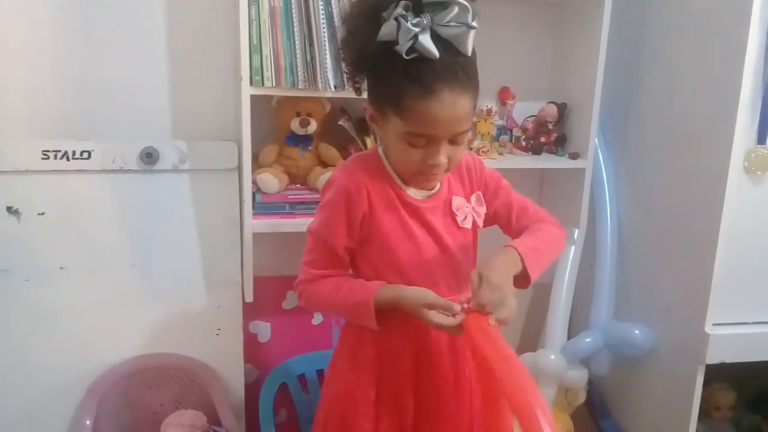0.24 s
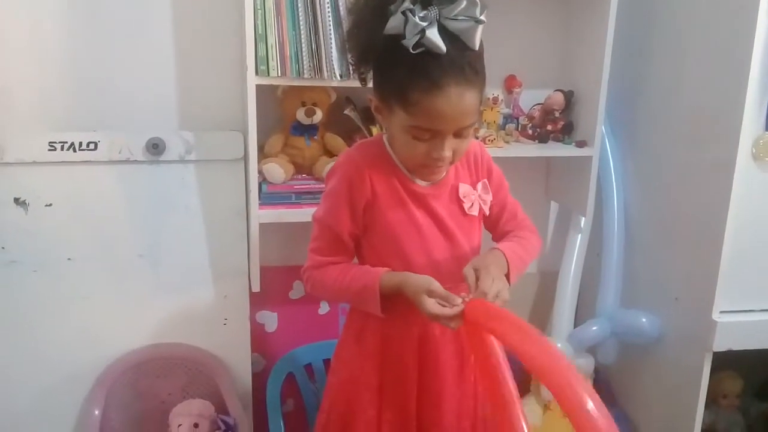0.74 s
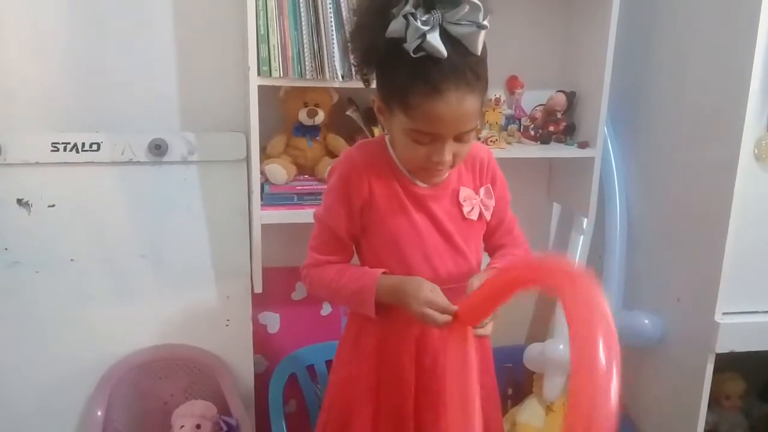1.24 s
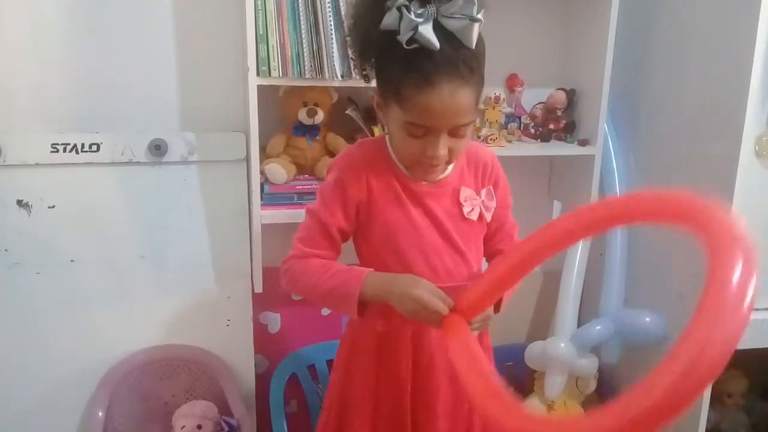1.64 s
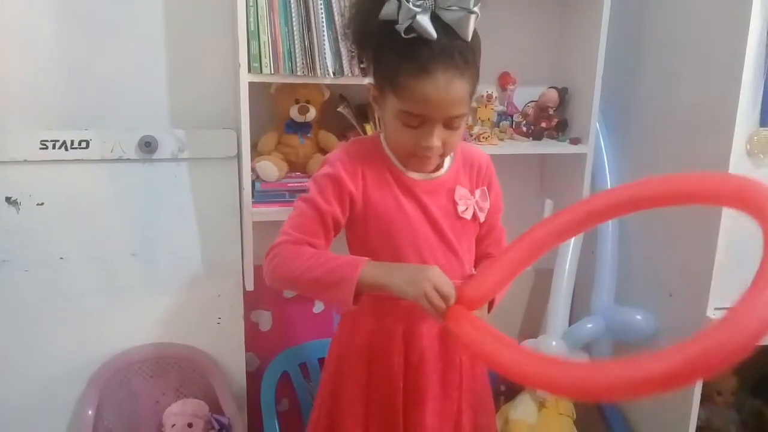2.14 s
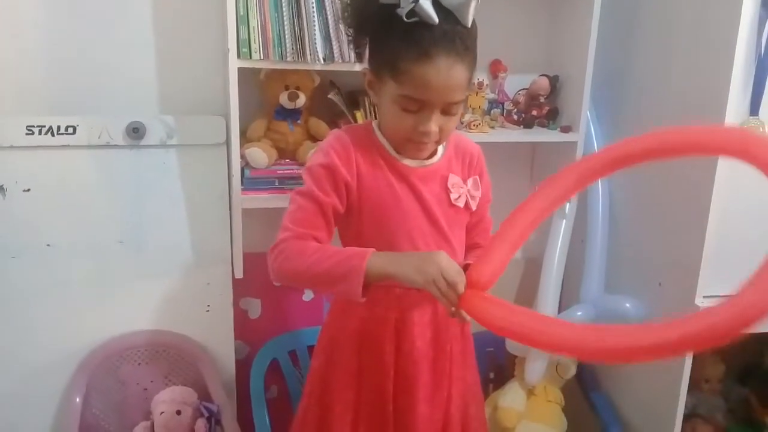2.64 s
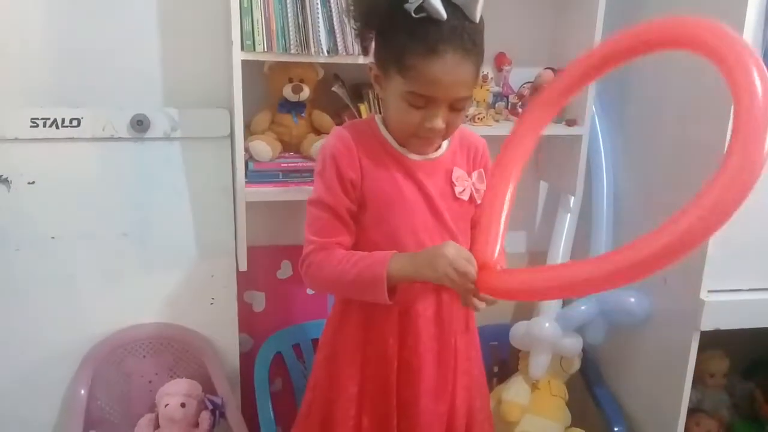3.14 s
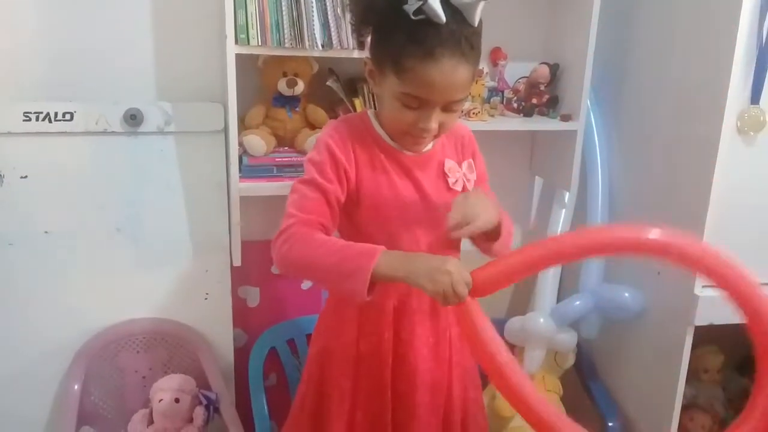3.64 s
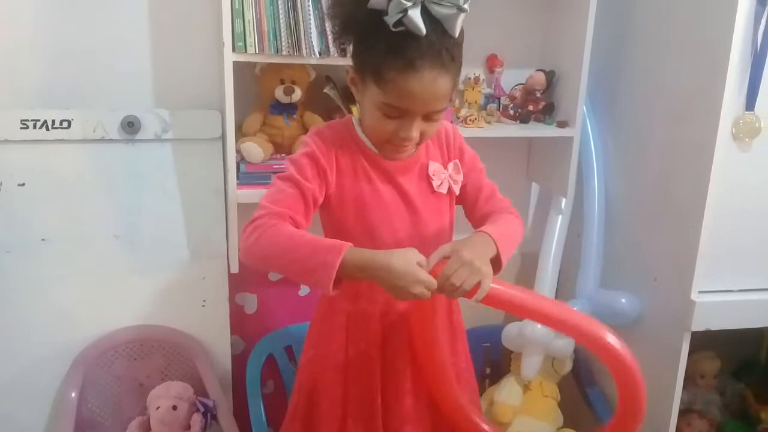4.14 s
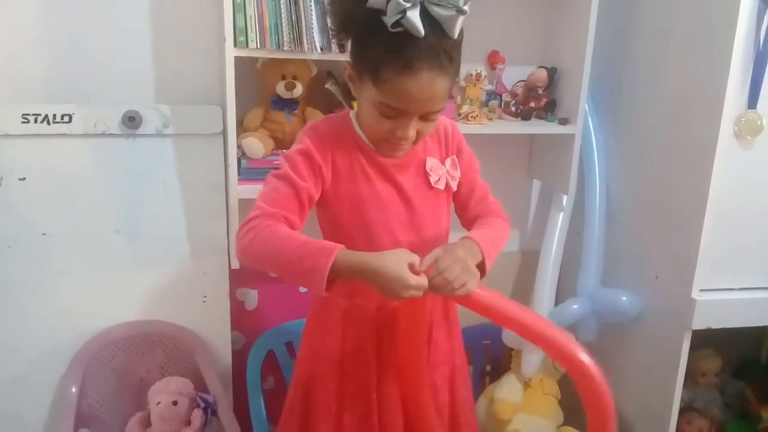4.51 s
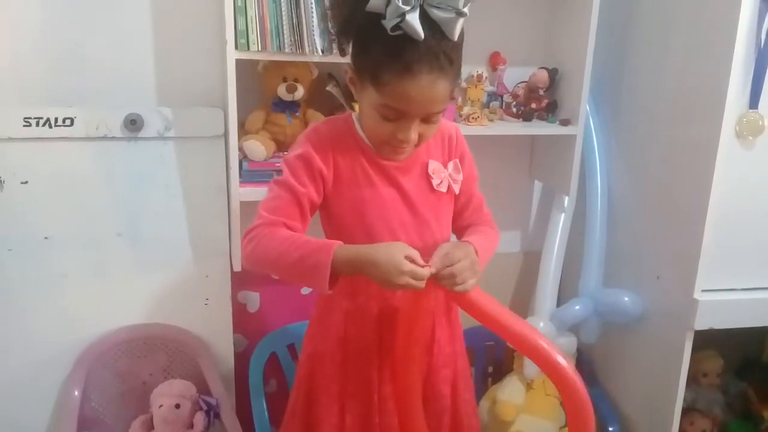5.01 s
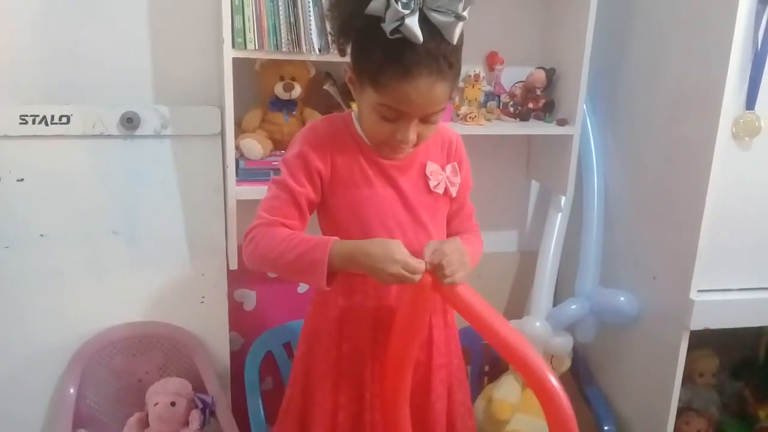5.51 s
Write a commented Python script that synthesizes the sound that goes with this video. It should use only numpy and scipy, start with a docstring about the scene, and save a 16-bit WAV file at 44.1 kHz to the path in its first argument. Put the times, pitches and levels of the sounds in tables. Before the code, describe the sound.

A long latex balloon is twisted and knotted by hand in a small, lively room, heard close by. From 0.1 to 0.4 s, sharp snaps and tight ratcheting creaks burst out over a low, wavering groan. Soft uneven drags and a strong snap follow at 0.65 to 0.85 s. Between 1.1 and 1.8 s, snaps and buzzy creaks come in quick clusters, each setting off a short hollow balloon ring. It nearly quiets around 1.9 s, then lighter snaps resume, with creaks at 2.3 and 2.45 s and a strong cluster near 2.6 s. Weaker, scattered snaps and faint squeals continue to 3.4 s. After a pause, soft grainy strokes hiss from 4.0 s, with a clear snap at 4.75 s. Tiny gliding chirps and fading rubs occupy 5.1 to 5.8 s. Dense short echoes and faint bass-heavy room noise stay behind everything.

```python
"""A long latex balloon is twisted into a loop and knotted by hand in a small room.
From the start the stretched skin sticks and slips under the fingers: soft drags of tiny uneven steps,
sharp snaps, creaks made of runs of hard slips, and brief wavering squeals. Slips set the balloon's modes ringing.
Later, strokes over the knot hiss softly, made of grainy coloured noise, with short gliding chirps.
Dense echoes and a faint steady room noise lie behind it all."""
import sys
import numpy as np
from scipy import signal
from scipy.fft import rfft, irfft, next_fast_len
from scipy.io import wavfile

SR = 44100
rng = np.random.default_rng(int(sys.argv[2]) if len(sys.argv) > 2 else 0)


def log_audio(samples):
    """Write samples as a 16-bit WAV file to the path given in sys.argv[1]."""
    # one column per channel
    frames = np.atleast_2d(samples).T
    # limit to full scale, then quantise
    limited = np.clip(frames, -1, 1)
    pcm = np.round(limited * 32767).astype(np.int16)
    wavfile.write(sys.argv[1], SR, pcm)


N = 254155
TIME = np.arange(N) / SR
LN_60DB = np.log(1000)  # a 60 dB decay as a natural logarithm


# Lone snaps, the skin letting go once: start_s, level_db, bass_db, edge_db
SNAPS = [(0.1206, -7.5, -2, -22), (0.1297, 1, -1.5, -15), (0.6571, -9, 10.5, -22), (0.8125, -11.5, -4, 3.5),
         (0.825, 2.5, 3.5, -6), (1.1376, -1.5, 6.5, -17), (1.1436, -8.5, 10.5, 9), (1.4537, 2, 3.5, 3),
         (1.5734, -4.5, 3, 2), (1.6905, 1.5, -18, -15), (1.941, -33.5, -6, 21), (1.9632, -33, 17.5, 20),
         (2.0456, -26, 0, 16.5), (2.0529, -9, -6, 7.5), (2.079, -12.5, -7, 2), (2.1311, -9.5, -33, 2),
         (2.3049, -10, -6, -11), (2.5604, 0.5, -10, -11), (2.5972, -7.5, -1, -3), (2.6197, 4.5, -24, -2.5),
         (2.6344, 0.5, -4, -3), (2.6904, -16.5, -16, 11.5), (2.7399, -11.5, 4, -6), (2.9479, -13, -24, -28),
         (2.9878, -10.5, 4.5, -20), (3.043, -11.5, 10.5, -43), (3.0989, -4.5, 0.5, -17),
         (3.2326, -9.5, -22, -11), (3.304, -7.5, -8, 1.5), (3.928, -10, -1.5, -24), (4.043, -20, 8, 4),
         (4.249, -23, 9.5, -3), (4.747, -5, -13, -28)]


def slips(flutter_s=0.0011, dulling=0.13, size=160):
    """Each slip is a snap followed by a millisecond of flutter as the skin catches again."""
    out = np.zeros(N)
    events = SNAPS + creak_slips()
    chance = rng.standard_normal((len(events), size))
    fade = np.exp(-np.arange(size) / SR / flutter_s)
    for (start, level_db, bass_db, edge_db), noise in zip(events, chance):
        push = colour(0.12 * noise, [(1000, -2.0), (5000, 2.5)]) * fade
        push[0] = -1  # the snap itself
        push /= np.linalg.norm(push)
        # a sharp edge lifts all the treble; a soft one loses mainly the very top
        treble_db = max(edge_db, dulling * edge_db)
        pulse = skin_pulse(bass_db, treble_db, edge_db)
        add(out, start, undb(level_db) * np.convolve(push, pulse))
    return out


# Creaks, runs of hard slips while the neck is twisted:
# start_s, end_s, rate_slips_per_s, slip_level_db, creep_level_db, bass_db, edge_db
CREAKS = [(0.1473, 0.2002, 113, 7.5, -33.5, -6, -5), (0.2196, 0.2806, 51, 6, -32, -8, 0),
          (0.3824, 0.4121, 96, 3, -31.5, -8.5, -1.5), (1.1759, 1.2612, 60, 6.5, -31, 3.5, -8.5),
          (1.282, 1.3434, 67, -2, -34.5, 0.5, -11.5), (1.5064, 1.5343, 70, -1.5, -47, 2, -7),
          (1.5938, 1.6136, 76, -2, -45.5, 5.5, -14), (1.7139, 1.7595, 105, 2, -33, -5.5, -5.5),
          (2.316, 2.3437, 114, -2.5, -38.5, -3.5, -8.5), (2.44, 2.507, 48, -17.5, -52.5, 4, 8)]
HURRY = 0.2  # the slips of a creak come quicker as the grip gives way
SLIP_JITTER_S, SLIP_SCATTER_DB = 0.0005, -0.62
CREAK_PEAK_S = 0.033  # the force builds for this long, then eases
CREAK_RISE_DB_PER_S, CREAK_EASE_DB_PER_S = 68, 103


def creak_slips(count=24):
    """The slips of every creak as (start_s, level_db, bass_db, edge_db): they quicken, swell and ease off."""
    rows = []
    chance = rng.standard_normal((len(CREAKS), 2, count))
    for (start, end, rate, level_db, _, bass_db, edge_db), (timing, force) in zip(CREAKS, chance):
        length = end - start
        progress = np.linspace(0, 1, int(round(length * rate)) + 1)
        ages = length * progress * (1 + HURRY * (1 - progress))
        rise_db = CREAK_RISE_DB_PER_S * (ages - CREAK_PEAK_S)
        ease_db = CREAK_EASE_DB_PER_S * (CREAK_PEAK_S - ages)
        effort_db = np.minimum(rise_db, ease_db)
        for age, effort, late, hard in zip(ages, effort_db, timing, force):
            slip_s = start + age + SLIP_JITTER_S * late
            slip_db = level_db + effort + SLIP_SCATTER_DB * hard
            rows.append((slip_s, slip_db, bass_db, edge_db))
    return rows


CREEP_LAG_S, CREEP_OVERRUN_S = 0.006, 0.013
CREEP_BASS_DB = 6.5  # between the slips the skin creeps, deeper in tone


def creak_creep():
    """The drag that runs under every creak, as (start_s, end_s, level_db, bass_db, edge_db)."""
    return [(start + CREEP_LAG_S, end + CREEP_OVERRUN_S, creep_db, bass_db + CREEP_BASS_DB, edge_db)
            for start, end, _, _, creep_db, bass_db, edge_db in CREAKS]


# Drags, soft runs of tiny slips: start_s, end_s, level_db, bass_db, edge_db
DRAGS = [(0.011, 0.062, -44.5, -3.5, -5.5), (0.438, 0.514, -47, 3, 5.5), (0.546, 0.6, -52.5, 13, -27),
         (0.655, 0.709, -42, 8, 15), (0.72, 0.79, -61, -1, 11), (0.824, 0.856, -32, 8, 0),
         (0.878, 0.99, -55, 17.5, -3), (1.06, 1.092, -51.5, 7, 1), (1.224, 1.3, -26, 5, -28),
         (1.46, 1.533, -44, -2, -25), (2.073, 2.132, -59, 6.5, 2), (2.33, 2.377, -36.5, 2.5, -10),
         (2.5, 2.58, -42.5, 3, -4), (2.56, 2.685, -39.5, 5.5, -3), (2.956, 3.02, -48.5, -11, -12),
         (3.007, 3.165, -51.5, 12, -7), (3.233, 3.278, -48.5, 2, -7), (3.326, 3.375, -43, 10, -5.5),
         (3.719, 3.748, -54, -7, -34), (3.86, 3.908, -55.5, 13.5, -35), (3.925, 3.969, -49, -13, -9),
         (4.084, 4.144, -61, 23.5, -2), (4.393, 4.449, -48, 9.5, 19.5), (4.75, 4.783, -39, -7.5, -19.5),
         (5.025, 5.046, -66.5, 21.5, 5)]
DRAG_TREBLE_DB = -2
DRAG_DULLING = 0.3  # share of a soft edge that also dulls the lower treble


def drags(rate_hz=300, jitter=0.4, scatter_db=1.5, count=160):
    """The skin creeps under a finger in quick uneven steps; a longer stick lets go harder."""
    out = np.zeros(N)
    events = DRAGS + creak_creep()
    chance = rng.standard_normal((len(events), 2, count))
    for (start, end, level_db, bass_db, edge_db), (timing, force) in zip(events, chance):
        sticks = np.exp(jitter * timing) / rate_hz
        at = np.cumsum(sticks) - sticks[0]
        length = max(end - start, sticks[0])
        inside = at < length
        strength = np.sqrt(sticks) * undb(scatter_db * force)
        steps = np.zeros(int(length * SR) + 1)
        steps[(at[inside] * SR).astype(int)] = strength[inside]
        # the finger presses in and eases off
        pressure = np.sqrt(signal.windows.tukey(len(steps), 0.5) + 0.035)
        steps = (steps - steps.mean()) * pressure
        treble_db = DRAG_TREBLE_DB + DRAG_DULLING * min(edge_db, 0)
        pulse = skin_pulse(bass_db, treble_db, edge_db)
        add(out, start, -undb(level_db) * signal.fftconvolve(unit(steps), pulse))
    return out


# How the skin radiates a slip: frequency_hz, level_db
SKIN = [(50, -37.5), (130, -13), (400, -8), (1100, -2), (2200, 0.5), (2750, -4), (3200, -9), (4000, -4.5),
        (5200, -7.5), (6400, -13), (7200, -21.5), (11000, -24.5), (13000, -29.5), (16000, -36.5)]


def skin_pulse(bass_db, treble_db, air_db, round_s=0.0004594, rebound=0.15, spread=0.23, size=1024):
    """Causal response of the skin to one slip; a small tight patch is brighter, a wide one deeper."""
    hz = np.fft.rfftfreq(size, 1 / SR)
    patch = [(220, min(bass_db, 1.03 * bass_db)), (650, bass_db), (1200, 0.31 * bass_db), (2000, 0.01),
             (2700, 0.22 * treble_db), (4300, treble_db), (5300, treble_db), (9000, air_db)]
    gain = undb(on_log_axis(SKIN, hz) + on_log_axis(patch, hz))
    # folding the cepstrum forward gives minimum phase: the sound starts at once
    cepstrum = irfft(np.log(gain))
    cepstrum[1:size // 2] *= 2
    cepstrum[size // 2 + 1:] = 0
    # the snap circles the tube a few times; the girth differs from spot to spot
    lap_s = round_s * np.exp(spread * rng.standard_normal())
    lap = np.exp(-2j * np.pi * hz * lap_s)
    pulse = irfft(np.exp(rfft(cepstrum)) / (1 - rebound * lap))
    for centre_hz, width_hz in [(2060, 800), (5200, 690), (11000, 980)]:
        pulse = disperse(pulse, centre_hz, width_hz)
    return pulse


def disperse(x, hz, width_hz):
    """Waves cross the skin at different speeds, so an all-pass spreads a snap into a few cycles."""
    r = np.exp(-np.pi * width_hz / SR)
    poles = [1, -2 * r * np.cos(2 * np.pi * hz / SR), r * r]
    return signal.lfilter(poles[::-1], poles, x)


# Ringing modes of the balloon, levels relative to each other: frequency_hz, level_db, t60_s
MODES = [(120.7, -11, 0.64), (175, -14, 0.098), (293.6, -25, 0.057), (311.6, -31, 0.93), (431, -24.5, 0.36),
         (624, -21, 0.76), (679.3, -22, 0.29), (1201.6, -18.5, 0.51), (1250, -25, 0.42),
         (1446, -18.5, 0.13), (1536, -19.5, 0.41), (1714, -27, 0.033), (2232, -21.5, 0.23)]


def ring(x):
    """The balloon's modes sing on after each slip as decaying sines."""
    t = TIME[:SR // 2]
    modes = np.zeros(len(t))
    for hz, level_db, t60 in MODES:
        equal_energy = np.sqrt(4 * LN_60DB / t60 / SR)
        decay = np.exp(-LN_60DB * t / t60)
        modes += undb(level_db) * equal_energy * np.sin(2 * np.pi * hz * t) * decay
    return signal.fftconvolve(x, modes)[:N]


# Squeals and groans, where the slipping locks to a mode of the skin or the air column:
# start_s, end_s, pitch_hz, level_db, unsteadiness_db
SQUEALS = [(0.154, 0.503, 119.8, -57, 3.5), (0.665, 0.684, 182, -43.5, 3.5), (0.728, 0.792, 180.6, -53, 3),
           (0.825, 0.835, 189.3, -41, 2), (1.156, 1.247, 193.3, -44, 3.5), (1.35, 1.432, 1168, -56, -1),
           (1.9, 2.042, 1175, -75, 2), (2.707, 2.763, 1146, -53.5, 0), (3.348, 3.42, 1159, -50.5, 2)]


def squeals(waver=0.005, octave_db=-20, attack_s=0.014, release_s=0.034):
    """Regular slipping: a wavering tone and its octave that ring out when the finger stops."""
    out = np.zeros(N)
    clock = np.cumsum(1 + waver * walk(90)) / SR
    grip = walk(110)
    for start, end, hz, level_db, unsteady_db in SQUEALS:
        phase = 2 * np.pi * hz * clock
        attack = np.clip((TIME - start) / attack_s + 0.5, 0, 1)
        release = np.exp(-np.clip(TIME - end, 0, 1) / release_s)
        tone = np.sin(phase) + undb(octave_db) * np.sin(2 * phase)
        out += undb(level_db + unsteady_db * grip) * attack * release * tone
    return np.sqrt(2) * out  # levels are rms


# Colour of the sliding: frequency_hz, level_db
SLIDE_COLOUR = [(100, -31.5), (600, -9.5), (1100, -5), (1800, 2), (2500, 2.5), (3200, -5), (4200, 1),
                (5700, 4), (7300, -6.5), (9000, -8), (10800, -1.5), (12500, -12.5), (14500, -6.5),
                (16000, -12)]
# Strokes of the fingers over the latex: start_s, end_s, level_db, body_db, edge_db
STROKES = [(0.654, 0.672, -49, 6.5, -18), (4.036, 4.174, -61, 3, -1.5), (4.238, 4.424, -51, -1.5, -1),
           (4.47, 4.574, -52, 1.5, 5), (4.726, 4.81, -52, 2.5, 2.5), (4.902, 4.95, -54, 4.5, -1.5),
           (5.072, 5.12, -53.5, -1.5, -1), (5.174, 5.273, -58, 1, -2), (5.445, 5.46, -64.5, -4, -12),
           (5.567, 5.63, -61, 0.5, -6.5), (5.708, 5.76, -62.5, -2, -3)]
STROKE_ATTACK_S, STROKE_RELEASE_S = 0.053, 0.034


def slide(grain_db=2.0, flicker_db=1.0):
    """Dry skin over slack latex: countless tiny catches merge into a hiss that swells with each stroke."""
    grains = rng.standard_normal(N) * undb(grain_db * walk(2500))
    hiss = unit(colour(grains, SLIDE_COLOUR))
    body = colour(hiss, [(2800, -1.5), (3600, -24)])
    air = colour(hiss, [(6000, -42), (7500, -3.5)])
    out = np.zeros(N)
    for start, end, level_db, body_db, edge_db in STROKES:
        attack = np.clip((TIME - start) / STROKE_ATTACK_S + 0.5, 0, 1)
        release = np.exp(-np.maximum(TIME - end, 0) / STROKE_RELEASE_S)
        toned = hiss + body * (undb(body_db) - 1) + air * (undb(edge_db) - 1)
        out += undb(level_db) * attack * release * toned
    return out * undb(flicker_db * walk(50))


# Chirps, squeaks that never quite lock and stay noisy: start_s, end_s, first_hz, last_hz, level_db
CHIRPS = [(3.716, 3.767, 2306, 2296, -68), (5.109, 5.182, 1754, 1643, -64), (5.235, 5.3, 2105, 2695, -66),
          (5.447, 5.502, 2460, 2410, -72.5), (5.709, 5.764, 5410, 5560, -61)]
CHIRP_WIDTH_HZ = 450


def chirps():
    """A narrow band of friction noise whose pitch glides with the pinch."""
    out = np.zeros(N)
    grain = walk(CHIRP_WIDTH_HZ) + 1j * walk(CHIRP_WIDTH_HZ)
    for start, end, first_hz, last_hz, level_db in CHIRPS:
        progress = np.clip((TIME - start) / (end - start), 0, 1)
        hz = first_hz + (last_hz - first_hz) * progress
        phase = 2 * np.pi * np.cumsum(hz) / SR
        swell = np.sqrt(4 * progress * (1 - progress))
        out += undb(level_db) * swell * np.real(grain * np.exp(1j * phase))
    return out


# Strength of the echoes; the treble beams forward and reaches the walls less: frequency_hz, level_db
ROOM_COLOUR = [(200, 2.5), (800, 3.5), (1500, 1.5), (2400, 1), (5000, -3), (12000, 0.5)]


def room(x, count=14):
    """The balloon swings about, so its echo pattern fades from one position to the next."""
    position = np.linspace(0, count - 1, N)
    out = np.zeros(N)
    for k in range(count):
        share = np.sqrt(np.maximum(1 - abs(position - k), 0))
        out += signal.fftconvolve(x * share, echoes())[:N]
    return colour(out, ROOM_COLOUR)


# Reverberation: frequency_hz, t60_s
ROOM_T60 = [(150, 0.44), (600, 0.35), (2000, 0.31), (5000, 0.37), (12000, 0.2)]


def echoes(first_s=0.0012, sparse_db=4):
    """Close walls and shelves: dense echoes nearly at once, each octave decaying at its own pace."""
    t = TIME[:SR * 2 // 3]
    # the early echoes are the most uneven in strength
    uneven_db = sparse_db * rng.standard_normal(len(t)) * np.exp(-t / 0.13)
    arrivals = rfft(rng.standard_normal(len(t)) * undb(uneven_db))
    hz = np.clip(np.fft.rfftfreq(len(t), 1 / SR), 125, 16000)
    octave = np.log2(hz / 125)
    tail = np.zeros(len(t))
    for k in range(8):
        t60 = on_log_axis(ROOM_T60, 125 * 2 ** k)
        band = irfft(arrivals * np.maximum(1 - abs(octave - k), 0), len(t))
        tail += band * np.exp(-LN_60DB * t / t60)
    tail *= np.clip(t / first_s - 0.5, 0, 1)
    return tail / np.linalg.norm(tail)


# Spectrum of the still room: frequency_hz, level_db
QUIET = [(25, -21.5), (50, -6), (100, -0.5), (160, -3), (250, -13), (500, -16), (1000, -21), (2200, -20),
         (3200, -30.5), (5500, -28), (8000, -34), (16000, -29.5)]
QUIET_DB = -68.5


def still_room():
    """Faint steady background noise, heaviest in the bass."""
    return undb(QUIET_DB) * unit(colour(rng.standard_normal(N), QUIET))


def undb(db):
    """Decibels to gain."""
    return 10 ** (np.asarray(db) / 20)


def unit(x):
    """Scale to rms 1."""
    return x / np.sqrt(np.mean(x ** 2))


def on_log_axis(points, hz):
    """Join (Hz, value) points by straight lines over log frequency."""
    f, value = np.transpose(points)
    return np.interp(np.log(np.maximum(hz, 1)), np.log(f), value)


def colour(x, points):
    """Filter by a (Hz, dB) spectrum."""
    size = next_fast_len(len(x))
    gain = undb(on_log_axis(points, np.fft.rfftfreq(size, 1 / SR)))
    return irfft(rfft(x, size) * gain, size)[:len(x)]


def walk(rate):
    """Smooth chance with a spread near 1, drawn anew rate times a second."""
    return 1.5 * np.interp(TIME * rate, np.arange(N), rng.standard_normal(N))


def add(out, start, sound):
    """Mix a sound in at a time in seconds."""
    i = max(int(start * SR), 0)
    out[i:i + len(sound)] += sound[:max(N - i, 0)]


def scene():
    """The balloon in its room, over faint background noise."""
    rubbing = slips() + drags()
    hiss = slide() + chirps()
    balloon = rubbing + hiss + undb(-3.5) * ring(rubbing) + squeals()
    return (balloon + room(rubbing + hiss) + still_room())[None]


def record(dry):
    """The recorder cuts the top: a steep low-pass at 16.1 kHz."""
    low_pass = signal.ellip(10, 0.2, 70, 16100, fs=SR, output="sos")
    return signal.sosfilt(low_pass, dry)


dry = scene()
out = record(dry)
log_audio(out)
```